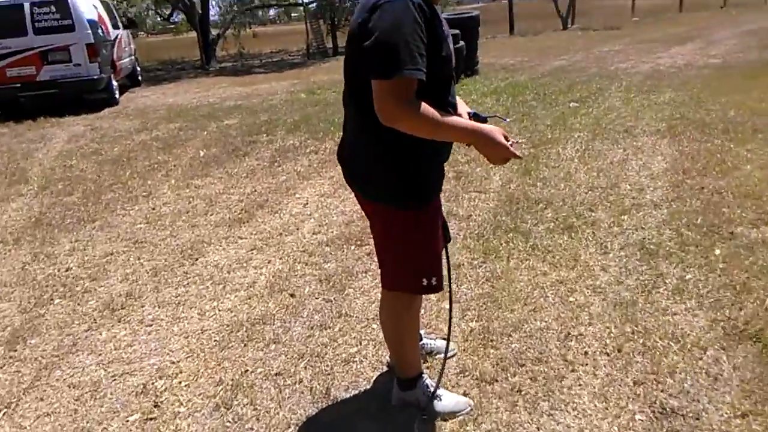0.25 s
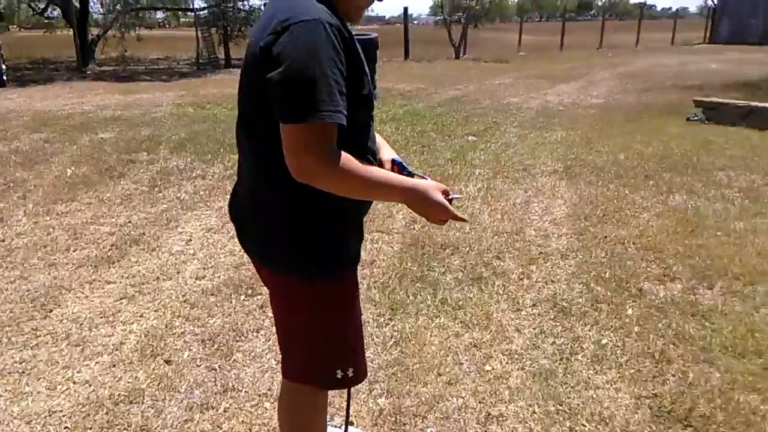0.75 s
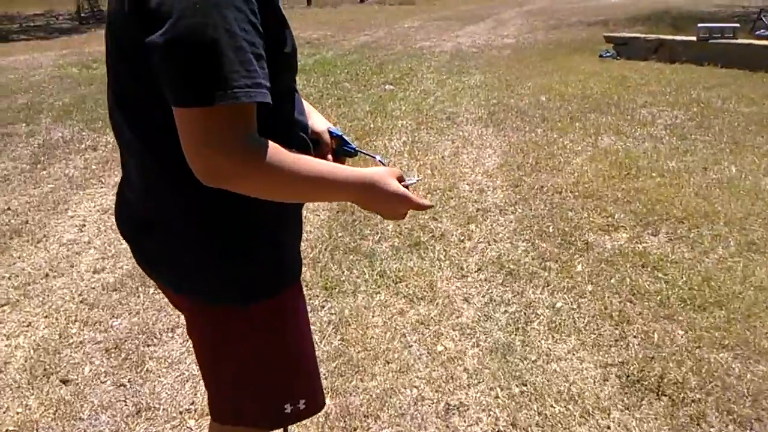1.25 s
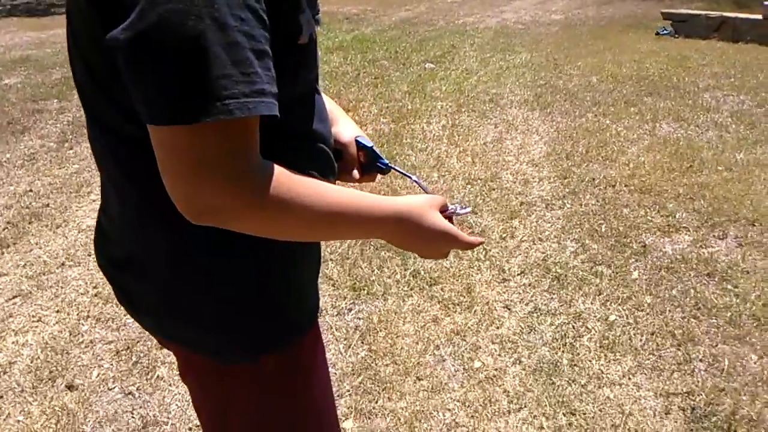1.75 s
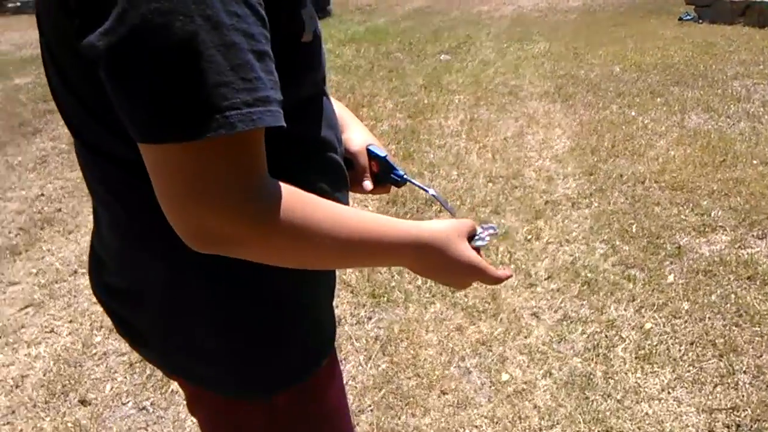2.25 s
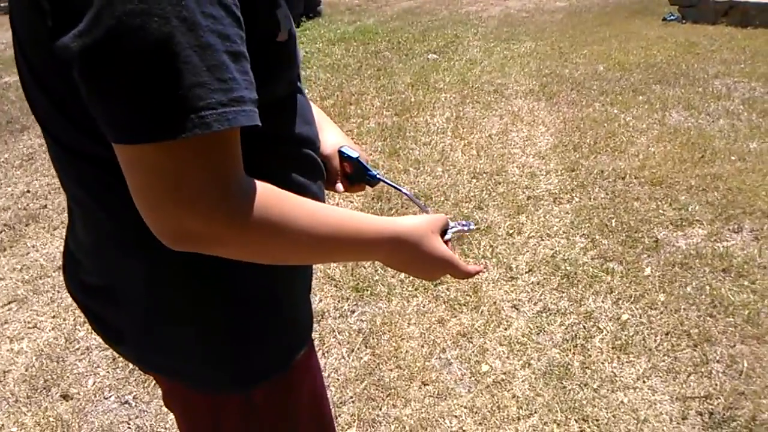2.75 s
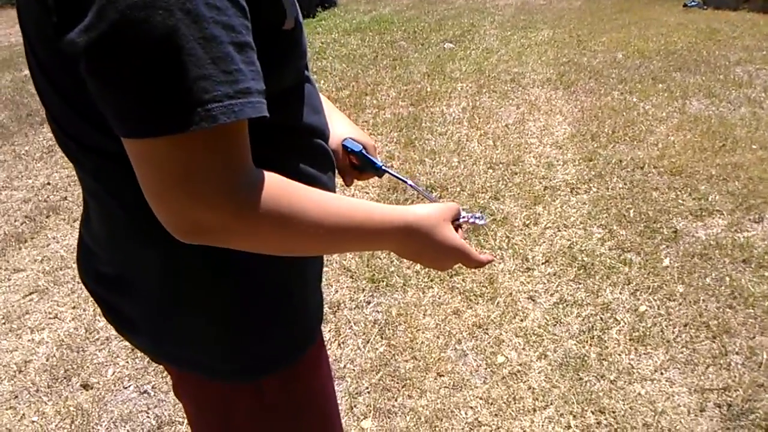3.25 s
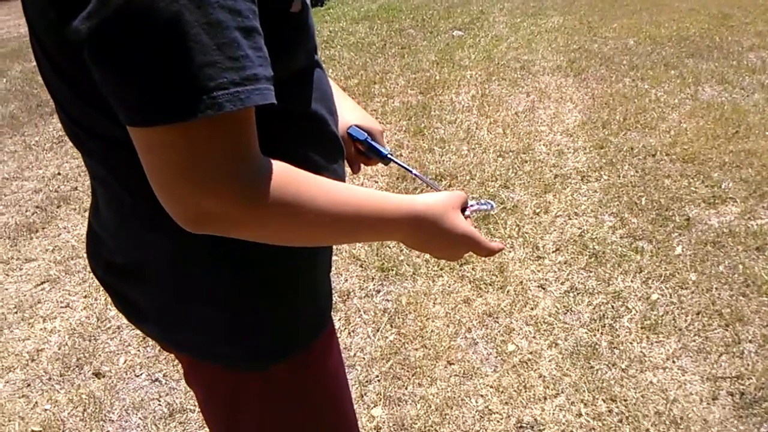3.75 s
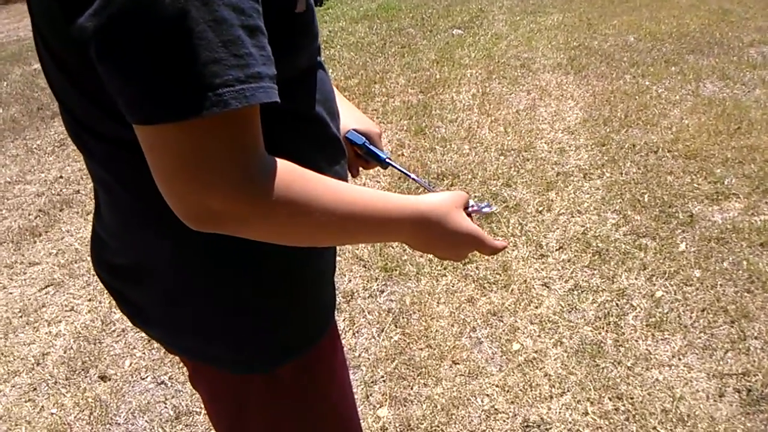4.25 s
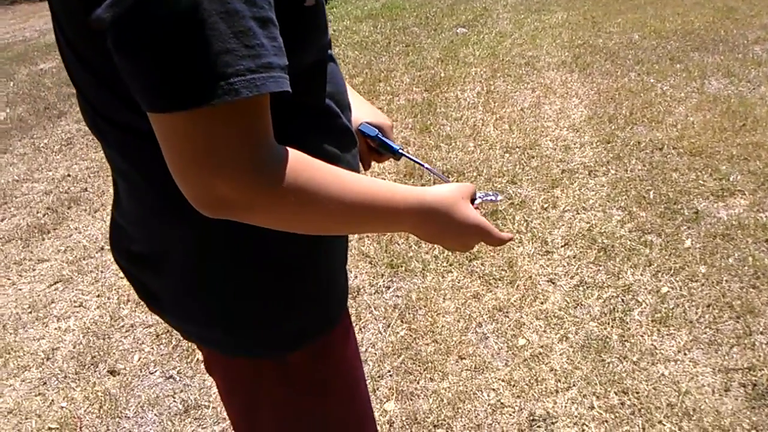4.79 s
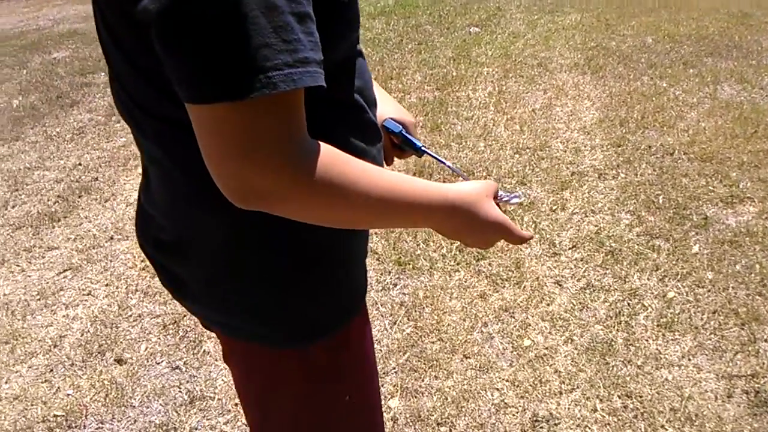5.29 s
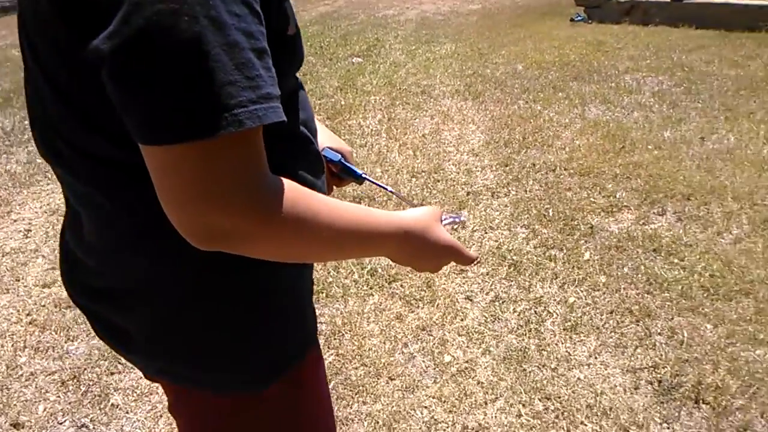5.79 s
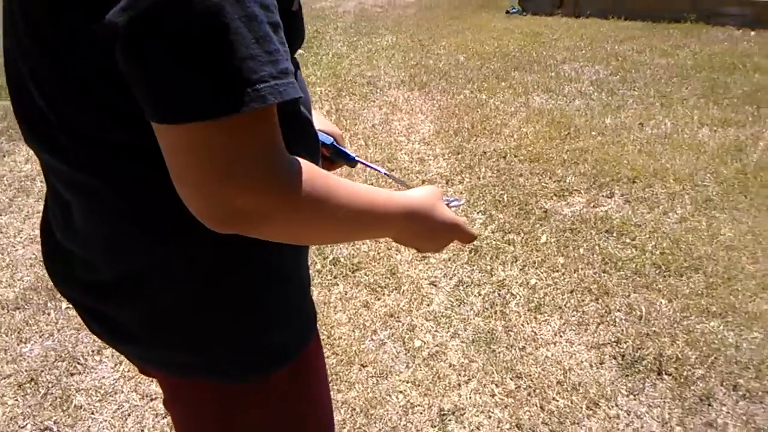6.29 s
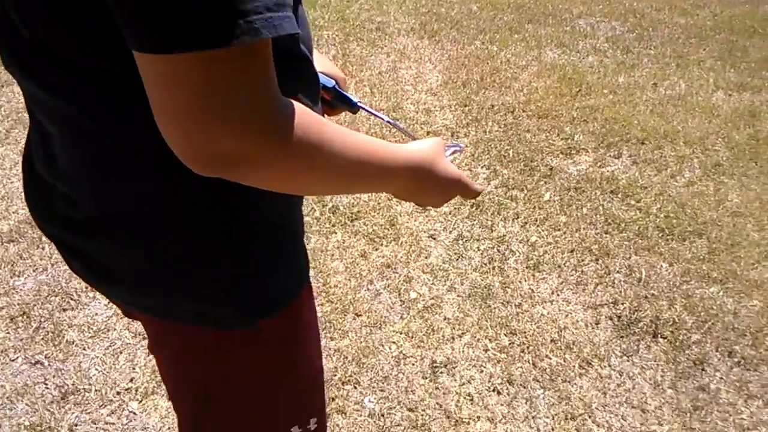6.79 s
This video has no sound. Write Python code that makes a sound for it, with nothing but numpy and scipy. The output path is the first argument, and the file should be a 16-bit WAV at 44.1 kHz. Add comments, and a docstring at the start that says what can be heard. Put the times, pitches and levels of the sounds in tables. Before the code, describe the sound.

From 0 to 0.35 seconds, strong wind gusts thump and flap low on the microphone, mainly on the left, over a very faint airy leak. At about 0.36 seconds a blow gun opens almost instantly into a loud, continuous hiss: sharp, sizzling treble from the nozzle and a rougher mid-band rush, slightly to the right, where air breaks on a small toy and hand. More heavy wind knocks come around 0.6 to 0.8, then smaller scattered rumbles. The blast stays steady but grainy and fluttering through 4.7 seconds. After about 3.3 a very faint, wavering low hum of the spinning toy emerges, mostly masked. From 4.8 the brightest hiss weakens, dropping clearly near 5.9, leaving a softer, smoother, more mid-range rush until 7 seconds. The sound is close, dry, wide and outdoors; the air never stops.

```python
"""On a lawn, a blow gun is opened and aimed at a small toy spinning between the fingers.
A leak hisses faintly alone; then the free jet hisses and the air breaks on toy and hand: shaped noises.
The rotor's two wavering sines, barely there at first, swell after about three seconds.
Gusts thump on two microphone ports: noise read at the wind's speed, plus single dying swings.
Each port has a treble resonance of its own, which colours the shear hiss and the leak."""
import sys
import numpy as np
from scipy import signal
from scipy.fft import rfft, irfft, next_fast_len
from scipy.io import wavfile
from scipy.ndimage import map_coordinates

SR = 44100
rng = np.random.default_rng(int(sys.argv[2]) if len(sys.argv) > 2 else 0)


def voltage_ratio(level):
    """Linear amplitude factor for a level in decibels (scalar or array-like)."""
    return 10 ** (np.asarray(level, float) / 20)


def to_wav(sig):
    """Store sig (one row per channel, or 1-D mono) as 16-bit WAV at the path in sys.argv[1].

    Samples outside -1..1 are clipped; the rate is SR.
    """
    pcm = np.clip(np.atleast_2d(sig), -1, 1) * 32767
    pcm = np.round(pcm).astype(np.int16)
    wavfile.write(sys.argv[1], SR, pcm.T)  # frames by channels


N = 310023


def rms_one(x):
    """Scales each channel to rms 1."""
    return x / np.sqrt(np.mean(x ** 2, axis=-1, keepdims=True) + 1e-20)


def in_time(rows):
    """Columns of a table, one value per sample."""
    s, *columns = np.transpose(rows)
    return [np.interp(np.arange(N) / SR, s, c) for c in columns]


def drift(rate_hz):
    """Slow chance: noise at every 40th sample through a double one-pole low-pass; spread 1."""
    r = np.exp(-80 * np.pi * rate_hz / SR)
    coarse = rng.standard_normal(N // 40 + 2002)
    slow = signal.lfilter([1], [1, -2 * r, r * r], coarse)[2000:]   # without the filter's run-in
    return np.interp(np.arange(N) / 40, np.arange(len(slow)), rms_one(slow))


def noise(spectrum, channels):
    """Unrelated noises of one colour, rms 1."""
    size = next_fast_len(N)
    hz, density_db = np.transpose(spectrum)
    bins_hz = np.linspace(1, SR / 2, size // 2 + 1)
    gain = voltage_ratio(np.interp(np.log(bins_hz), np.log(hz), density_db, right=-90))
    white = rng.standard_normal((channels, N))
    return rms_one(irfft(rfft(white, size) * gain, size)[:, :N])


def sides(level_db, pan_db):
    """Left and right gains of two unrelated sounds whose mean has the given level."""
    return 2 * voltage_ratio(level_db) / np.sqrt(1 + voltage_ratio(np.array([-2 * pan_db, 2 * pan_db])))


def delayed(x, delay_ms):
    """Reads each channel late by a moving delay."""
    position = np.arange(N) - delay_ms * SR / 1000
    return np.array([map_coordinates(v, [position], order=3, mode="nearest") for v in x])


def peaks(x, modes):
    """A chain of resonant lifts."""
    for hz, width_hz, lift_db in modes:
        w, a, g = 2 * np.pi * hz / SR, np.pi * width_hz / SR, voltage_ratio(lift_db / 2)
        x = signal.lfilter([1 + a * g, -2 * np.cos(w), 1 - a * g],
                           [1 + a / g, -2 * np.cos(w), 1 - a / g], x)
    return x


# resonance of each port cavity: centre_hz, width_hz, lift_db
LEFT_RESONANCE = [(10980, 3200, 14.4)]
RIGHT_RESONANCE = [(9670, 1200, 8)]


def ports(x):
    """Each port cavity lifts its own treble band."""
    return np.array([peaks(x[0], LEFT_RESONANCE), peaks(x[1], RIGHT_RESONANCE)])


def turbulence(spectrum, alike, lead_us, flutter_db):
    """Both ports share a part of the noise, the right one later; the rest is scattered and their own."""
    shared, left, right = noise(spectrum, channels=3)
    late, = delayed([shared], lead_us / 1000)
    both = np.sqrt(alike) * np.array([shared, late]) + np.sqrt(1 - alike) * np.array([left, right])
    return both * voltage_ratio(flutter_db * np.array([drift(19), drift(19.4)]))


def unsteady():
    """Slow wavering in dB, drawn anew for each layer."""
    return 0.74 * drift(3.7)


# where the nozzle lies as the port pair hears it: time_s, left_lead_us
NOZZLE_LEAD = [(.4, -8), (.75, 14), (1.0, 14), (1.45, -15), (1.65, 37), (3, 45), (5.5, 52), (6.1, 15),
               (7, 34)]


def nozzle_lead():
    """Microseconds by which the nozzle's sound reaches the left port first."""
    return in_time(NOZZLE_LEAD)[0]


# the stream: time_s, strength_db (as shear hiss), contact_db with toy and hand (as splash),
# pan_db (left over right, as the nozzle turns left)
STREAM_MOVES = [(0.39, -12, -27.5, -1), (0.52, -11.5, -25.5, 1), (0.63, -13, -24.5, -1.5),
                (0.68, -11, -21, 1.0), (0.96, -14, -25.5, 0), (1.04, -12, -22, -1), (1.28, -11.5, -28, 1),
                (1.33, -11, -25, 1.5), (1.57, -13.5, -25.5, 0.0), (2.24, -12, -22.5, 1),
                (3.72, -12.5, -23.5, 1.0), (4.77, -13, -22, 2.5), (4.85, -14.5, -20.5, 4),
                (5.1, -17, -24, 5.5), (5.38, -16.5, -21.5, 4.5), (5.75, -18, -21.5, 5.0),
                (5.94, -25, -24.5, 4), (6.34, -24.5, -24, 3.5), (6.49, -26.5, -24, 1.5),
                (6.7, -26, -24, 4.0), (6.79, -27.5, -26.5, 2.5), (7.03, -24, -27.5, 5.0)]


def jet():
    """The valve frees the air; hiss at the nozzle and breakup at toy and hand swell with the flow."""
    shear_db, splash_db, nozzle_pan_db = in_time(STREAM_MOVES)
    flow_db = shear_db + 12      # relative to full flow
    contact_db = splash_db + 23   # relative to full contact
    hand_pan_db = -3 - 0.58 * nozzle_pan_db   # leans right, more so as the nozzle turns left
    valve_s, rise_s = 0.3598, 0.011   # the trigger opens
    since_s = np.arange(N) / SR - valve_s
    far = shear_hiss(shear_db, nozzle_pan_db) + fine_hiss(flow_db, nozzle_pan_db)
    near = toy_edges(flow_db, hand_pan_db, since_s) + hand_splash(splash_db, hand_pan_db)
    near = near + low_roar(flow_db, contact_db, hand_pan_db)
    opened = np.clip(since_s / rise_s, 0, 1) ** 2
    arrived = np.clip(since_s / (2.2 * rise_s), 0, 1) ** 2   # the stream needs time to reach the hand
    return (opened * far + arrived * near) * voltage_ratio(0.5 * drift(11.4))


# colour of the shear layer before the ports: pitch_hz, density_db (relative, per Hz)
SHEAR_COLOUR = [(6500, -35), (8300, -5), (9000, -1.5), (11500, -5), (12100, -7.5), (13000, -37)]


def shear_hiss(level_db, pan_db):
    """The jet's shear layer tears into turbulence: a treble hiss coloured by the ports."""
    hiss = turbulence(SHEAR_COLOUR, 0.21, nozzle_lead(), flutter_db=0.55)
    return sides(level_db, pan_db) * rms_one(ports(hiss))


# colour of the finest turbulence: pitch_hz, density_db (relative, per Hz)
FINE_COLOUR = [(11000, -27), (12200, 0), (13000, 2.5), (14000, -2.5), (16000, -34)]


def fine_hiss(flow_db, pan_db):
    """The finest turbulence: a higher hiss that follows most of the flow's swing."""
    level_db = -21 + 0.92 * flow_db + unsteady()
    hiss = turbulence(FINE_COLOUR, 0.036, nozzle_lead(), flutter_db=1.0)
    return sides(level_db, pan_db + 1.9) * hiss


# colour of the air on the toy's edges: pitch_hz, density_db (relative, per Hz)
EDGE_COLOUR = [(4300, -30), (5100, -10.5), (5600, -1.5), (6600, -2.5), (7600, -1.5), (8400, -7.5),
               (9500, -15)]


def toy_edges(flow_db, pan_db, since_s):
    """Air breaks on the toy's edges, more weakly until the aim has settled on the toy."""
    settle_db = -3.5 * np.exp(-np.maximum(since_s, 0) / 0.28)   # time constant in s
    level_db = -18 + 0.91 * flow_db + settle_db + unsteady()
    edge = turbulence(EDGE_COLOUR, 0.22, nozzle_lead() + 15, flutter_db=0.83)
    palm = delayed(edge, 1.6 + 0.1 * drift(2.04))   # the palm mirrors the edges
    return sides(level_db, pan_db) * rms_one(edge + voltage_ratio(-7.0) * palm)


# colour of the splash before its delays: pitch_hz, density_db (relative, per Hz)
SPLASH_COLOUR = [(1100, -25), (1500, -27), (1900, -7.5), (2500, -0.5), (3200, 0), (3700, 2.5), (4500, 2),
                 (5000, 1.5), (5700, -0.5), (7000, -19)]


def hand_splash(level_db, pan_db):
    """The stream splashes on the hand: a middle-band hiss combed by close delays."""
    splash = combed(turbulence(SPLASH_COLOUR, 0.31, np.zeros(N), flutter_db=1.18))
    return sides(level_db + unsteady(), pan_db) * splash


# echo off the holder's body: time_s, delay_ms, level_db
BODY_MIRROR = [(.4, 0.78, -18), (1.3, 1.3, -11), (1.6, 1.03, -22), (5.2, 1.23, -17), (5.8, 0.942, -14),
               (7.0, 1.06, -6)]
# short wandering delays that make the hiss ragged: delay_ms, level_db (before the fade), wander_ms
SHORT_DELAYS = [(2.0, -7.5, 0.11), (3.1, -8, .12), (4.601, -6.5, .12)]
# the raggedness fades after 5.2 s: time_s, gain_db of the short delays
RAGGED_GAIN = [(5.2, 0), (5.9, -7)]


def combed(x):
    """Close delays comb the hiss; their slow random drift moves narrow gaps and ridges."""
    delay_ms, level_db = in_time(BODY_MIRROR)
    x = x + voltage_ratio(level_db) * delayed(x, delay_ms + 0.018 * drift(2.8))
    ragged_db, = in_time(RAGGED_GAIN)
    delay_filter = signal.butter(2, 2440, "high", fs=SR, output="sos")
    for delay_ms, level_db, wander_ms in SHORT_DELAYS:
        upper = signal.sosfilt(delay_filter, x)   # the lows stay smooth
        x = x + voltage_ratio(level_db + ragged_db) * delayed(upper, delay_ms + wander_ms * drift(2.78))
    return rms_one(x)


# colour of the low roar: pitch_hz, density_db (relative, per Hz)
ROAR_COLOUR = [(40, -35), (70, -9), (130, -6), (400, -1.5), (800, -1), (1500, 0.5), (2100, 1), (3000, -5.5)]


def low_roar(flow_db, contact_db, pan_db):
    """Large-scale turbulence: a low roar that follows both flow and contact in part."""
    level_db = -30 + 0.4 * flow_db + 0.5 * contact_db
    return sides(level_db, pan_db) * turbulence(ROAR_COLOUR, 0.087, np.zeros(N), flutter_db=1.5)


# the spinning toy: time_s, turns_hz (before jitter), level_db (before flutter and panning)
ROTOR_TURNS = [(3.2, 184, -59), (3.9, 185.3, -46), (4.7, 186.4, -45.5), (5.0, 184.9, -51),
               (6.0, 185.5, -48), (7.0, 187.9, -43.5)]


def rotor():
    """The lobes chop the air: a fluttering hum at the turning rate and its double."""
    turns_hz, level_db = in_time(ROTOR_TURNS)
    phase = 2 * np.pi * np.cumsum(turns_hz + 5 * drift(12)) / SR
    single = voltage_ratio(-3.5 + 3.5 * drift(22)) * np.sin(phase)
    double = voltage_ratio(3.6 * drift(13)) * np.sin(2 * phase)
    return voltage_ratio(level_db) * (single + double)


# colour of the leak before the ports: pitch_hz, density_db (relative, per Hz)
LEAK_COLOUR = [(500, -6), (1700, -7.5), (2700, -10), (6300, -13), (8500, -6.5), (11500, -8.5), (14000, -15)]
# the leak's whistle band: centre_hz, width_hz, lift_db
WHISTLE_BAND = [(4240, 600, 11)]
# the leak's course: time_s, level_db, pan_db (left over right)
LEAK_LEVEL = [(0.0, -40, -3), (0.236, -40.5, -9), (0.32, -46, -12)]


def leak():
    """Air seeps past the valve; its faint whistle band is lifted in the right port alone."""
    level_db, pan_db = in_time(LEAK_LEVEL)
    left, right = noise(LEAK_COLOUR, channels=2)
    return sides(level_db, pan_db) * rms_one(ports([left, peaks(right, WHISTLE_BAND)]))


# colour of the eddies at speed 1: pitch_hz, density_db (relative, per Hz)
EDDY_COLOUR = [(20, -1), (60, 1.5), (130, -4.5), (200, -9), (300, -26), (600, -47), (2000, -65)]
# gusts: peak_s, peak_db and pan_db (left over right) before flutter and rounding off,
# fall_s (to 10 dB down either side; a negative one leaves the gust out), centre_hz of the rumble
GUST_PEAKS = [(0.03, -18, 20, .035, 159.8), (0.119, -14, 7, 0.03, 180), (0.2, -16, 20, 0.0349, 155),
              (0.3, -14, 20, 0.05, 210), (0.37, -20, 14, .05, 150), (0.53, -25, -1, 0.08, 130),
              (0.589, -19, 20, .06, 220.1), (0.65, -19.5, 25, 0.04, 340), (0.79, -23, 18, 0.11, 240),
              (0.906, -25, 17, 0.09, 160.2), (1.05, -24, 18, 0.11, 155.1), (1.16, -28, -11, 0.03, 134.8),
              (1.32, -23, -19, 0.02, 120), (1.46, -28.5, -10, 0.11, 110), (1.85, -33, 4, 0.1, 155.3),
              (2.04, -33, -6, .1, 155), (2.19, -35, -2, 0.07, 150), (2.351, -27, -8, 0.07, 165.3),
              (2.46, -29, 11, 0.15, 120), (2.59, -31, 3, 0.08, 130), (3.131, -36, -4, .05, 139.8),
              (3.285, -29.5, -9, 0.09, 120), (3.5, -37, -6, .07, 180), (3.63, -37, -6, 0.08, 155),
              (4.02, -28, -16, 0.08, 220.4), (4.12, -35, 5, 0.03, 110), (4.27, -31, 10, 0.02, 99.7),
              (4.43, -30.5, -11, 0.07, 110), (4.64, -28, -15, 0.12, 155), (4.81, -29, -13, 0.1, 110),
              (5.02, -38, -1, 0.08, 120), (5.35, -35, 2, 0.02, 130), (5.56, -37, -2, -0.04, 200.3),
              (5.75, -33.5, -8, 0.15, 105.1), (5.889, -37, -13, .04, 100), (6.28, -35, -7, 0.12, 105),
              (6.769, -31, 13, 0.19, 100), (7.02, -35, 13, .15, 100)]
# wind between the gusts: time_s, level_db (before wavering and rounding off)
BREEZE_LEVEL = [(0.0, -30), (.45, -33), (1.2, -40), (2.8, -44), (4.7, -42), (5.1, -50), (6.5, -50),
                (7.0, -42)]


def wind():
    """Eddies pass each port: a stronger gust is louder and carries them faster, so higher in pitch."""
    t = np.arange(N) / SR
    breeze_hz, eddy_hz = 150, 110   # centre of the breeze's rumble, centre at speed 1
    breeze_db, = in_time(BREEZE_LEVEL)
    wavering_db = 2.3 * np.array([drift(5.03), drift(5.0)])
    power = 2 * voltage_ratio(breeze_db + wavering_db) ** 2
    pitched = power * breeze_hz   # centres weighted by power
    for s, peak_db, pan_db, fall_s, centre_hz in GUST_PEAKS:
        near = slice(max(int((s - 2 * fall_s) * SR), 0), int((s + 2 * fall_s) * SR))
        swell = voltage_ratio(-10 * ((t[near] - s) / fall_s) ** 2)
        gust = (sides(peak_db, pan_db)[:, None] * swell) ** 2
        power[:, near] += gust
        pitched[:, near] += gust * centre_hz
    gain = np.sqrt(power) * voltage_ratio(2.2 * np.array([drift(34.13), drift(34.5)]) - 1.5)
    speed = (pitched / power / eddy_hz) ** 0.8 * (gain / voltage_ratio(-30)) ** 0.3
    speed = np.clip(speed, 0.6, 3.8)
    eddies = noise(EDDY_COLOUR, channels=2)
    passing = [np.interp(np.cumsum(v) % (N - 1), np.arange(N), e) for v, e in zip(speed, eddies)]
    low_cut = signal.butter(4, 50, "high", fs=SR, output="sos")
    thumps = signal.sosfilt(low_cut, gain * passing + buffets())
    return 0.85 * np.tanh(thumps / 0.77)   # the membranes round off the hardest thumps


# single buffets: peak_s, level_db (before doubling, filters and rounding off),
# pan_db (only its sign counts: negative strikes right), swing_hz (nominal)
BUFFET_HITS = [(0.032, -9, 20.5, 219), (0.106, -16, 17, 222), (0.117, -10, 11.0, 171), (0.125, -9, 14, 288),
               (0.15, -7, 10.5, 172), (0.184, -19, 29, 175), (0.201, -6, 20.5, 197), (0.247, -8, 24.0, 291),
               (0.282, -19, 29.0, 196), (0.294, 0, 27.5, 220), (0.303, -4.5, 23.5, 468),
               (0.324, -11, 21, 172), (0.331, -3.5, 12.5, 476), (0.612, -8, 26, 180),
               (0.644, -4, 23.5, 480), (0.664, -11, 21, 269.8), (0.786, -14, 17.5, 230.6),
               (1.045, -18, 17, 182.4), (1.307, -14, -17.0, 337.6), (1.423, -29, -15, 193),
               (1.482, -18, -0.5, 170.7), (2.345, -20, -9, 177), (3.289, -24, -14, 209),
               (4.01, -18, -17, 281), (4.619, -16.5, -17.0, 192.8), (4.699, -23, -11.5, 188)]


def buffets():
    """A lone eddy bursts on the windward port: the pressure swings briefly, ever slower, and dies."""
    out = np.zeros((2, N))
    phases = rng.uniform(0, 2 * np.pi, len(BUFFET_HITS))
    for (s, level_db, pan_db, hz), phase in zip(BUFFET_HITS, phases):
        cycles = np.arange(int(8 * SR / hz)) * hz / SR
        age = cycles / 0.8
        swell = 2 * age * np.exp(1 - 2 * age)   # peaks at 1 after 0.4 cycles
        start = round(s * SR - 0.4 * SR / hz)
        swing = np.sin(2 * np.pi * cycles ** 0.9 + phase)
        out[int(pan_db < 0), start:start + len(cycles)] += 2 * voltage_ratio(level_db) * swell * swing
    return signal.sosfilt(signal.butter(2, 900, fs=SR, output="sos"), out)


def scene():
    """Jet, hum, leak and wind at the two ports."""
    hum = rotor() * voltage_ratio(np.array([[1.5], [-1.5]]))   # leans left
    return jet() + hum + leak() + wind()


def band_limit(x):
    """A steep low-pass at the top of the band."""
    return signal.sosfilt(signal.butter(12, 14270, fs=SR, output="sos"), x)


def record(dry):
    """Limits the mix to full scale."""
    mix = np.clip(dry, -1.0, 1.0)
    return band_limit(mix)


dry = scene()
out = record(dry)
to_wav(out)
```